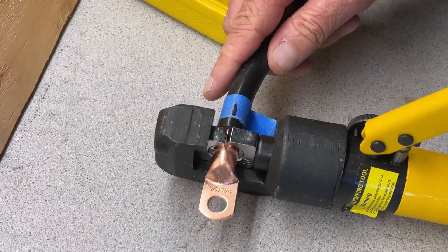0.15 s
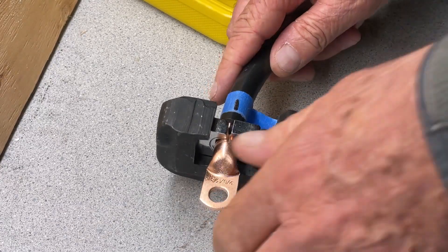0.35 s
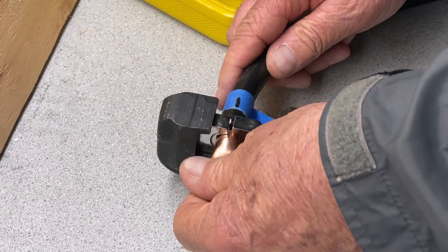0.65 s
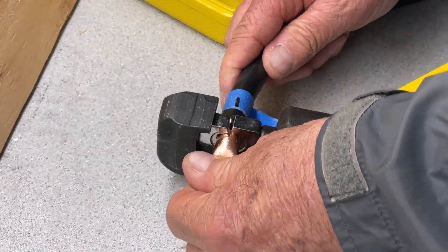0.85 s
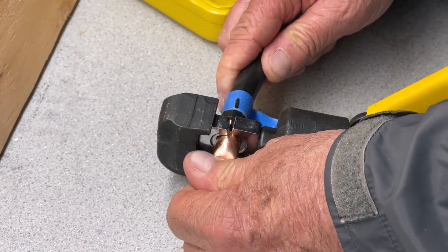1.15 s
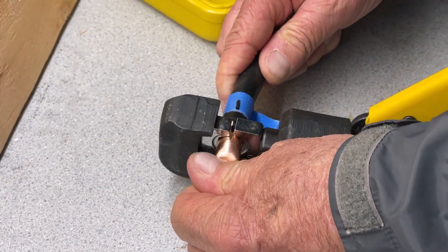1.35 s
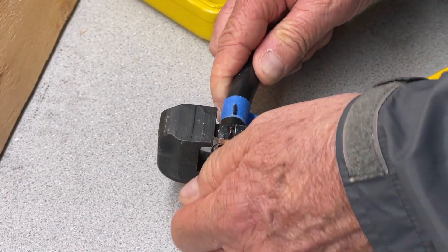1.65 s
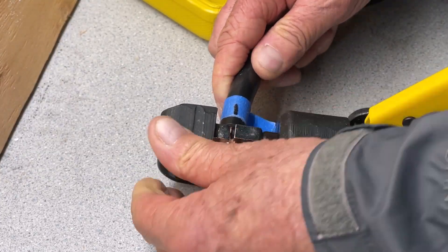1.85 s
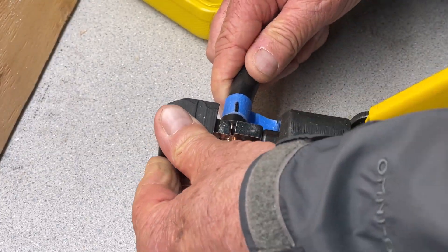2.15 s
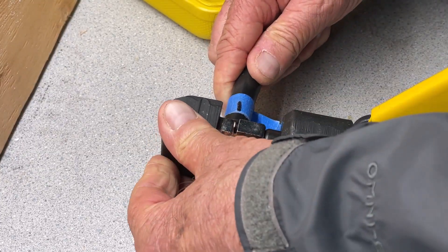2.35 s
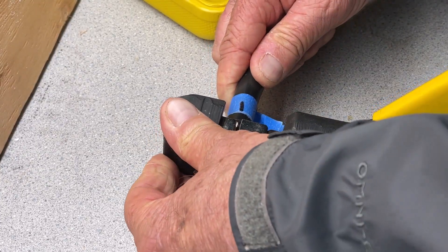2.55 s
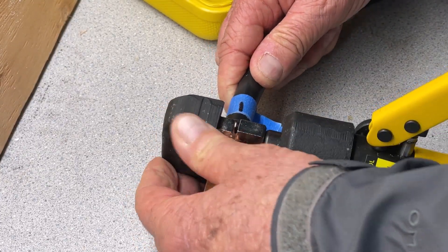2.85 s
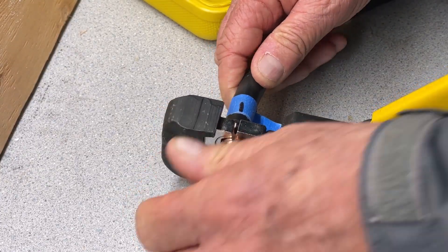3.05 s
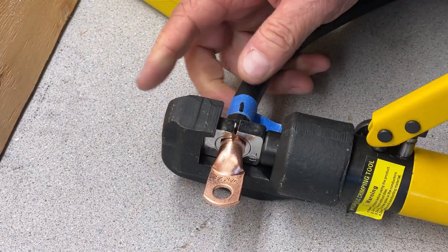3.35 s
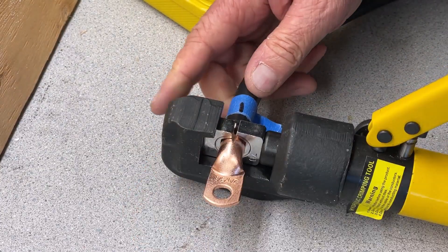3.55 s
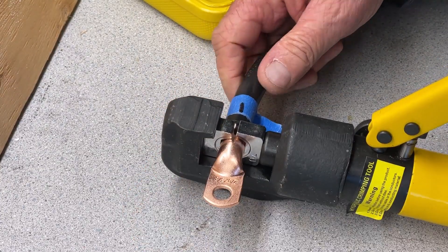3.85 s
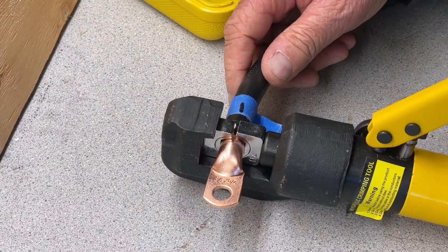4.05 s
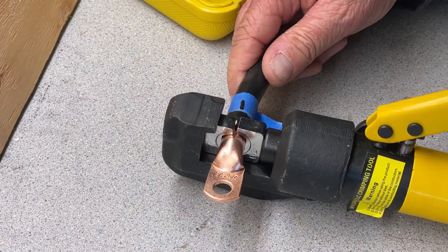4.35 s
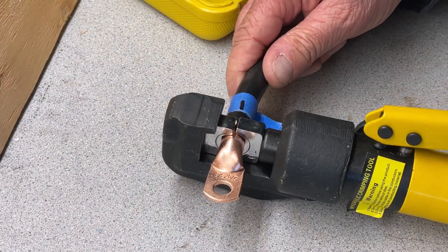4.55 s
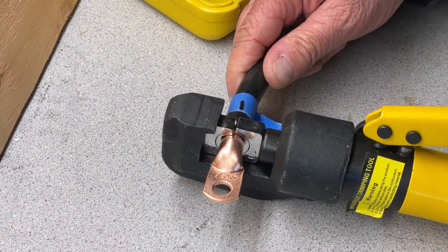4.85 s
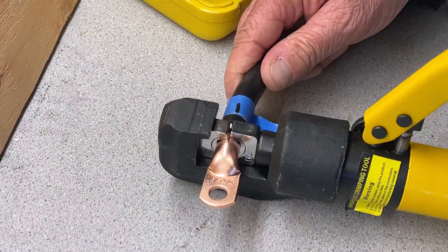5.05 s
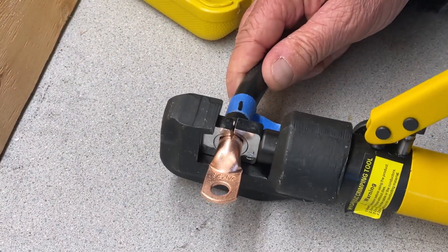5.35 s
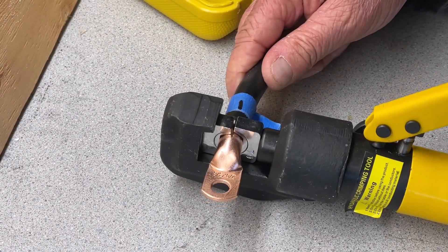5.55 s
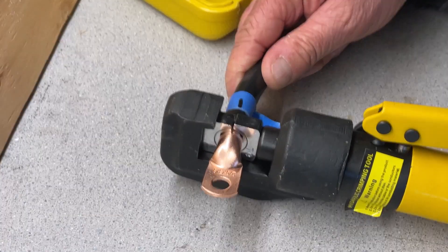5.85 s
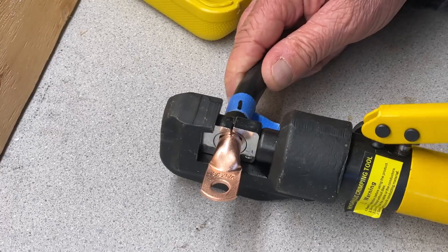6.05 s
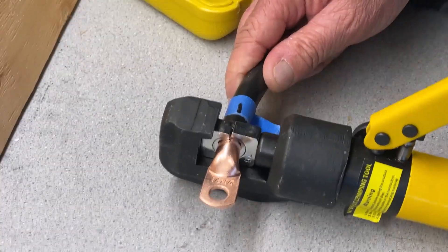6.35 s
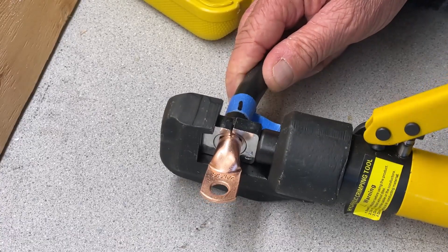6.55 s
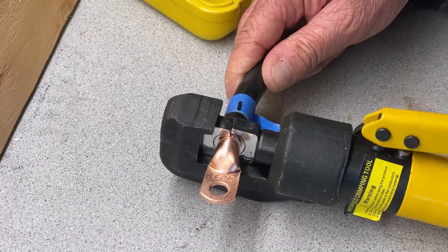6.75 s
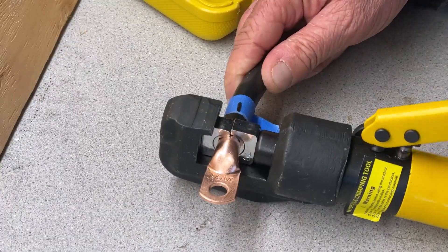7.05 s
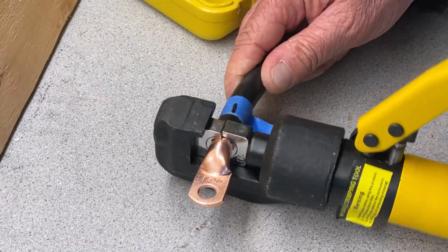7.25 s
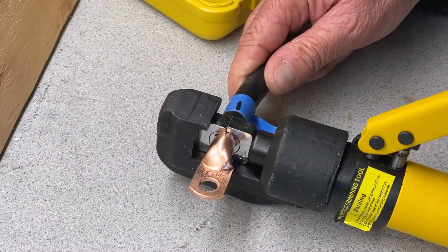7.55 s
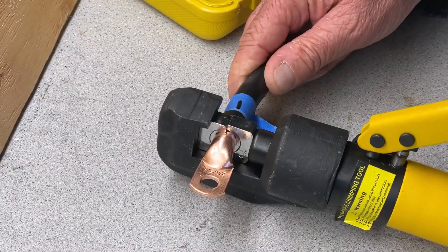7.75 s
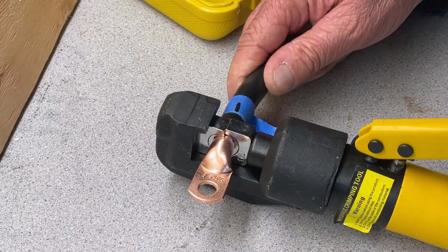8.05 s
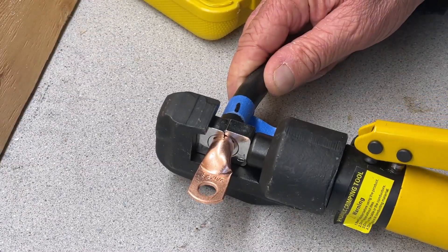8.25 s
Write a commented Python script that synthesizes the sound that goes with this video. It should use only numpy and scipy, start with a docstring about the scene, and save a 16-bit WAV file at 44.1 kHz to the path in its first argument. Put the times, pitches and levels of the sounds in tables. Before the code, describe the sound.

Hands shift a heavy hydraulic hand tool on a laminate bench, with a first firm knock, light taps, scraping jerks and brushing fabric. Then comes steady handle pumping, each stroke clicking and thudding into the hollow-sounding top over low rumble, growing to sharp steel clacks. A tiny buzz and faint whine trail off. Close microphone, dry small workshop.

```python
"""A thump through a laminate bench top is heard first, with the click of a hand-pumped hydraulic crimping tool.
Hands shift the tool and seat a lug, then pump the handle: pins click and each stroke ends in a thump.
Sleeves swish, skin rubs and the bench rumbles underneath; the microphone is close.
Blows and clicks excite decaying modes; friction is noise of a given colour under swelling envelopes.
Each source is computed as mid and side, and the pair is turned into left and right at the end."""
import sys
import numpy as np
from scipy import signal
from scipy.fft import rfft, irfft
from scipy.io import wavfile

SR = 44100
rng = np.random.default_rng(int(sys.argv[2]) if len(sys.argv) > 2 else 0)


def store_wav(level_fs):
    """Save 16-bit WAV to argv[1]."""
    pcm = np.round(np.clip(np.atleast_2d(level_fs), -1, 1) * 32767)
    wavfile.write(sys.argv[1], SR, pcm.T.astype(np.int16))


N = 370380
SPAN = 2 ** 15   # samples in one impulse response

# Blows into the bench: [t/s, mid peak level/dB, contact time constant/ms, weight behind the blow/dB,
# sway of the bench on its legs/dB, clank of steel on steel/dB, damping by the hands/(dB/s)]
THUMPS = [(.058, -11.5, 0.24, 4.5, -19, 5, 0), (.529, -18, 0.2, -18.5, 13, 0.5, 132),
          (.618, -43, 0.19, -25, 0, 3, 100), (1.576, -42, 0.43, -1, -11, 17, 24),
          (1.73, -34.5, 0.52, 21, 0, 0, 33), (1.924, -24, 0.26, -19, 14, 0, 139),
          (2.366, -51.5, 0.36, -19, -2, -8, 60), (2.754, -46, 0.68, -8, -4, -6, 30),
          (2.84, -49.5, 0.11, -40, 0, 12, 250), (2.878, -34, .64, -4, -16, 4, 95),
          (2.92, -15.5, 0.22, -22.5, 20, 3.5, 220), (4.638, -16.5, 1.3, -22, 2.5, 13, 11),
          (4.891, -30.5, 0.26, -2, 8.5, -3.5, 37), (5.071, -16, 0.77, 11.5, -3.5, -4, 198),
          (5.195, -1.5, 0.21, -2.8, -7, 6.5, 12), (5.392, -29.5, .92, 10, -8, 2.2, 24),
          (5.858, -12.5, 1.3, -18, -3.3, 16, 27), (6.081, -26.5, 0.46, -3.5, -14, -5, 24.5),
          (6.237, -12.5, 0.97, -1.8, -18, 0.5, 200), (6.351, -0.76, 0.25, -6, 9.5, 12.5, 17),
          (6.541, -31, 2.4, -7.5, -14, 15, 4), (6.819, -7, .67, -14, 16, -5, 40.5),
          (7.048, -28.5, 0.43, -7.5, 3, -5.5, 33), (7.207, -20.5, 1.3, 3.5, 2, -1.5, 195.5),
          (7.352, -0.9, 0.33, -11.5, -18, 23, 14.5), (7.543, -28.5, 1.2, 19, -29, 0, 24),
          (8.329, -33.5, 1.1, 28, 25, -5, 31)]
# Modes of the bench top, lowest first: [f/Hz, level/dB, t60/s]
BENCH_MODES = [(51, -9, 0.21), (82.6, -5, 0.26), (112, 1, 0.24), (143.4, -0.5, 0.18), (184.4, -8.5, 0.18),
               (240.5, 1.5, 0.12), (308, -9, 0.19), (347, -5, 0.033), (393, -7, 0.14), (466, 1, 0.051),
               (548, -6.5, 0.068), (662.4, -13, 0.062), (746.5, -11.5, 0.092), (962, -12.5, 0.084),
               (1059, -9.5, 0.055), (1123, -16, 0.03), (1232, -31, 0.43), (1256, -16.5, 0.066),
               (1440, -20.5, 0.068), (1750, -19.5, 0.11), (2160, -22.5, .03), (2700, -13.5, .02)]
# Modes of the steel tube of the handle: [f/Hz, level/dB, t60/s]
HANDLE_MODES = [(1200, 0, .75), (1556, 0, .45)]
# The handle meets its stop and rings: [t/s, level/dB]
HANDLE_RINGS = [(5.195, -48), (6.351, -52)]
CLANK_HZ, CLANK_OCTAVES = 1420, 0.87
PUSH_MS, PUSH_PER_CONTACT = 2.66, 2.7   # the slow push lasts longer under a softer contact
MODE_SPREAD_DB = 1.9   # each blow finds the modes a little differently
TRAVEL_MS = 12.19   # bending waves at 100 Hz, blow to microphone

# Pins, dies and valve balls clicking: [t/s, mid peak level/dB, pitch f/Hz, rattle t60/s, relative treble level/dB]
CLICKS = [(.0583, -34.5, 2390, .02, 7), (.1212, -39.5, 1910, 0.024, -6), (0.5316, -34, 1630, 0.021, -12.5),
          (1.927, -36.5, 1780, 0.023, -4), (2.8636, -46, 2380, 0.051, 1), (2.8977, -43.5, 2240, 0.059, -4),
          (2.9188, -36, 1410, 0.033, -7), (4.6394, -33, 1910, 0.03, 1), (4.859, -26, 4840, 0.049, -18.5),
          (4.873, -25, 4800, 0.018, -5.5), (4.884, -29, 1580, 0.022, -6), (4.893, -13.5, 3640, 0.024, 5),
          (5.0617, -38, 2510, .025, -3), (5.0835, -34, 3640, 0.022, -3), (5.1955, -12.5, 2025, 0.06, 5),
          (5.2177, -25.5, 1915, 0.036, -9), (5.232, -28, 2510, 0.044, -9), (5.86, -30.5, 1850, 0.01, -5),
          (6.0326, -36, 1500, 0.033, -9.5), (6.049, -33, 4100, 0.055, -8.5), (6.073, -23, 1490, 0.018, -6),
          (6.08, -12.5, 1820, 0.029, 13), (6.2036, -26, 4170, 0.025, -24), (6.2326, -23.5, 2470, 0.038, 7),
          (6.3516, -11, 1936, 0.063, 1.5), (6.8022, -37.5, 1500, 0.0077, -13),
          (6.8199, -28, 1850, 0.082, -19.5), (7.0026, -38, 1730, 0.017, -5), (7.0135, -28.5, 3970, .044, 6),
          (7.0406, -23.5, 1547, 0.023, 10.5), (7.0468, -15.5, 1515, 0.025, 5),
          (7.201, -38.5, 2236, 0.025, -3), (7.352, -2, 1510, 0.048, -3.5), (7.374, -18.5, 1448, 0.05, -3)]
# Modes of the steel head and linkage: [f/Hz, level/dB, t60/s]
STEEL_MODES = [(1480, 3, .009), (1970, 4, .007), (2430, 4.5, .007), (2930, 6, .006), (3610, 7, .008),
               (4100, 1, .008), (4600, 3, .01), (5030, 5, .008), (5750, -5, .007), (6120, -12, .007),
               (7250, -22, .03)]
CRACK_DB = 9   # broad crack beside the ringing steel

# Jerks of the tool slipping on the laminate: [t/s, relative level/dB, t60/s, relative treble level/dB]
SLIPS = [(1.016, -43.5, 0.2, 4), (1.039, -32, 0.069, 7.5), (1.081, -39, 0.11, -11), (1.095, -34, 0.14, -2),
         (1.109, -25, 0.047, 5), (1.133, -30.5, 0.25, 1), (1.144, -24, 0.089, 2), (1.16, -23.5, 0.046, 0),
         (1.166, -19, 0.018, 3), (1.191, -35, 0.073, 7.5), (1.224, -33, 0.065, 2.5),
         (1.318, -50, 0.029, 16.5), (2.017, -43, 0.073, 2.5), (2.151, -33, 0.054, 8),
         (2.172, -47.5, 0.37, 4), (2.256, -47, 0.032, 14), (2.536, -37, 0.049, 6),
         (2.67, -45.5, 0.039, 4.5), (8.237, -48, 0.048, -8), (8.325, -51, 0.069, -1)]
# Power density of grit on laminate: [f/Hz, level/dB]
LAMINATE_SPECTRUM = [(100, -16), (250, -1), (500, 6.5), (1200, -4), (2800, 3.5), (4500, -5), (8000, -5),
                     (13000, -13), (16000, -14)]

# The linkage buzzes on after the last stroke: [start t/s, rise/s, hold/s, level/dB]
BUZZ = [(7.355, .008, .07, -45.5)]
BUZZ_LOW_HZ, BUZZ_HIGH_HZ, BUZZ_FADE_DB_PER_S = 950, 1650, 65

# Two narrow resonances of the valve: [f/Hz, width of one filter pass/Hz, level/dB]
VALVE_RESONANCES = [(1250, 120, 0), (2000, 140, -5)]
WHINE_START_S, WHINE_DB, WHINE_FADE_DB_PER_S, WHINE_END_S = 7.4, -65, 8.5, 8.03
WHINE_WAVER_DB, WHINE_WAVER_HZ = 1.5, 12

# A nylon sleeve swishes: [start t/s, rise/s, hold/s, level/dB, extra sheen in the treble/dB]
SWISHES = [(.29, 0.049, .17, -52, 1.5), (.6, 0.093, .04, -61.5, 0), (1.05, 0.22, .1, -70, -12.5),
           (1.5, 0.23, .02, -60.5, -2), (1.73, 0.0072, .06, -73.5, 23), (1.8, 0.14, .03, -53, 2.5),
           (2.93, 0.19, .22, -48.5, 5.5), (3.49, 0.06, .26, -51, 2.5), (3.85, 0.018, .12, -60.5, 6.5),
           (4.095, 0.15, 0.082, -56, 4.5), (4.307, 0.11, .2, -46.5, 4.5), (4.78, 0.044, .06, -53.5, 7),
           (4.95, 0.045, .1, -56, 0), (5.2, 0.037, .08, -62, -11), (5.7, 0.15, .03, -58, -2),
           (6.1, 0.1, 0.051, -52, -0.5), (6.72, 0.092, .04, -55.5, -4), (6.97, 0.057, .03, -57, -9),
           (7.1, 0.066, .06, -55, 0), (7.3, 0.03, .2, -70, -3), (7.68, 0.074, .05, -63.5, -1),
           (8.15, 0.079, .09, -56.5, 2)]
# Faint hiss between swishes: [t/s, level/dB]
HISS = [(0, -65), (1.3, -64), (1.42, -78), (1.52, -64.5), (2.9, -68), (3.4, -56.5), (4.1, -60), (5.4, -62),
        (6.0, -70.5), (6.5, -68.5), (7.4, -59), (7.65, -68), (8.4, -66.5)]
# Power density of the nylon: [f/Hz, level/dB]
SWISH_SPECTRUM = [(700, -7), (1500, 0.5), (2500, 4.5), (4000, 2), (6000, 0), (8500, 1), (11000, -4),
                  (13500, -5.5), (15000, -4), (15700, -13.5), (16100, -4.5)]
SWISH_FADE_DB_PER_S, HISS_SHEEN_DB = 229, 1.5

# Hands grip, shift and lean: [start t/s, rise/s, hold/s, skin and cable rub level/dB, bench rumble level/dB]
MOVES = [(0, 0.0035, 0.14, -63.5, -55), (0.406, 0.16, 0.074, -59, -54.5), (1.021, 0.075, 0.1, -46, -38.5),
         (1.61, 0.11, .02, -84, -56), (1.89, 0.084, .02, -58, -53), (2.124, 0.041, 0.04, -54, -50.5),
         (2.36, 0.065, .04, -83, -65), (2.502, 0.038, 0.036, -59.5, -58), (2.71, 0.21, .02, -77, -47.5),
         (2.923, 0.071, 0.024, -52.5, -54), (3.132, 0.061, 0.18, -63, -58.5),
         (3.625, 0.18, .03, -67.5, -62), (4.095, 0.064, 0.5, -91, -68), (4.46, 0.027, 0.14, -85, -50.5),
         (4.705, 0.043, 0.63, -60.5, -49), (5.195, 0.08, 0.024, -56.5, -54),
         (5.617, 0.13, 0.89, -69.5, -49.5), (6.337, 0.017, 0.023, -51, -32.5),
         (6.66, 0.15, .02, -65, -43.5), (6.91, 0.045, 0.54, -63, -49.5), (7.32, 0.027, 0.11, -45.5, -44.5),
         (7.597, 0.13, .03, -65, -55), (7.984, 0.14, 0.018, -72, -52), (8.172, .09, 0.039, -63, -78)]
# Power density of the rub: [f/Hz, level/dB]
RUB_SPECTRUM = [(150, -50.5), (300, -1), (500, -2.5), (900, -8), (1500, -14), (2200, -27.5), (3000, -48)]
# Power density of the bench rumble: [f/Hz, level/dB]
RUMBLE_SPECTRUM = [(25, -30.5), (50, 8.5), (75, 0.5), (108, 5.5), (150, -1.5), (240, -7.5), (400, -33.5)]
MOVE_FADE_DB_PER_S, REST_RUB_DB, REST_RUMBLE_DB = 125.5, -71, -59.5
RISE_DB = 17.5   # every gesture starts this far below its full level

# The shop and the dense upper modes of the bench answering a blow: [f/Hz, level/dB, t60/s]
TAIL = [(50.6, -33.5, 1), (125, -11.5, 0.36), (290, -20.5, 0.54), (690, -25.5, 0.38), (1270, -32, 0.39),
        (2500, -13, 0.095), (6000, -34, 0.76), (14000, -46, .2)]
# Gain of the side signal, the width of the stage: [f/Hz, level/dB]
WIDTH = [(60, -26), (120, -17), (250, -6.5), (500, -4.5), (900, -2.5), (1300, -5), (1800, -20.5),
         (2500, -18.5), (6000, -6.5), (8000, -46.5), (9500, -10.5), (11000, -17), (13500, -31)]
# Phase between the microphone channels: [f/Hz, lead of the left/rad]
PHASE_TURN = [(1800, 0), (2700, .4), (4200, .6), (5080, .7), (5770, -1.7), (6720, -.5), (7580, -2.2),
              (8100, -2.4), (8750, -3.14), (9400, -3.6), (10200, -4.0), (11900, -5.6), (13200, -6.2),
              (16400, -6.3)]
MIC_LOW_HZ, STOPBAND_HZ = 49.6, 16800


def amp(db):
    """The definition of level: 20 dB to a factor of ten in amplitude."""
    return 10 ** (np.asarray(db) / 20)


def rms_one(x):
    """Normalisation by mean power, taken over all channels together."""
    return x / np.sqrt(np.mean(x ** 2) + 1e-20)


def at_hz(points, hz, axis=1):
    """Interpolation of a table column on a logarithmic frequency axis."""
    points = np.array(points)
    return np.interp(np.log(np.maximum(hz, 1)), np.log(points[:, 0]), points[:, axis])


def coloured(x, spectrum):
    """Linear filtering: each frequency of x is weighted by a spectrum in dB."""
    size = x.shape[-1]
    return irfft(rfft(x) * amp(at_hz(spectrum, np.fft.rfftfreq(size, 1 / SR))), size)


def filtered(x, order, hz, kind):
    """Butterworth filtering: a maximally flat passband."""
    return signal.sosfilt(signal.butter(order, hz, kind, fs=SR, output="sos"), x)


def wide_noise(spectrum):
    """Incoherence: independent mid and side noise of one colour, rms 1."""
    return rms_one(coloured(rng.standard_normal((2, N)), spectrum))


def drift(corner_hz):
    """Random modulation: noise through two equal low-pass poles, rms 1."""
    step = 40   # samples between computed values
    r = np.exp(-2 * np.pi * corner_hz * step / SR)
    noise = rng.standard_normal(N // step + 2002)
    slow = signal.lfilter([1], [1, -2 * r, r * r], noise)[2000:]
    return np.interp(np.arange(N) / step, np.arange(len(slow)), rms_one(slow))


def ringing(modes):
    """Modal decay: one exponentially decaying sine a mode, as rows."""
    hz, db, t60 = np.transpose(modes)[:, :, None]
    t = np.arange(SPAN) / SR
    return amp(db - 60 * t / t60) * np.sin(2 * np.pi * hz * t)


def gestures(rows, rest_db, fade_db_per_s):
    """Addition of powers: gestures swell, hold and fade in dB above a resting level."""
    t = np.arange(N // 64 + 2) * 64 / SR
    start, rise, hold, db = np.transpose(rows)[:, :, None]
    rising = RISE_DB * np.minimum((t - start) / np.maximum(rise, .004) - 1, 0)
    fading = fade_db_per_s * np.maximum(t - start - rise - hold, 0)
    power = np.sum(amp(db + rising - fading) ** 2 * (t >= start), axis=0)
    return np.sqrt(np.interp(np.arange(N) / SR, t, power) + amp(rest_db) ** 2)


def add(out, s, x):
    """Superposition: mix x in from time s."""
    i = round(s * SR)
    out[..., i:i + x.shape[-1]] += x[..., :N - i]


def thumps(answer):
    """Dispersion: a soft contact drives the modes and bending waves bring the treble first, a downward swoop."""
    out = np.zeros((2, N))
    hz = np.fft.rfftfreq(2 * SPAN, 1 / SR)
    bench, room = rfft(ringing(BENCH_MODES), 2 * SPAN), rfft(answer, 2 * SPAN)
    count = len(BENCH_MODES)
    chance = rng.normal(0, 1, (len(THUMPS), 2, count))
    # the delay falls as 1 / sqrt(f)
    swoop = np.exp(-4j * np.pi * TRAVEL_MS / 1000 * np.sqrt(100 * hz))
    # the time given is the arrival of the treble
    lead = np.exp(2j * np.pi * hz * TRAVEL_MS / 6000)
    clank_shape = np.exp(-(np.log2((hz + 1) / CLANK_HZ) / CLANK_OCTAVES) ** 2)
    for row, (strength, lean) in zip(THUMPS, chance):
        s, db, contact_ms, weight_db, sway_db, clank_db, damping_db = row
        # each mode reaches the sides out of step
        side_phase = np.exp(1j * (np.pi / 2 + .5 * lean))
        weights = amp(MODE_SPREAD_DB * strength) * np.array([np.ones(count), side_phase])
        weights[:, 0] *= amp(sway_db)   # the lowest mode is the whole bench on its legs
        contact = 1 / (1 + 2j * np.pi * hz * contact_ms / 1000) ** 3
        contact *= amp(clank_db * clank_shape)
        # the slow part of the blow feeds the lows
        push_ms = PUSH_MS + PUSH_PER_CONTACT * contact_ms
        push = amp(weight_db / (1 + (hz * push_ms / 1000) ** 4))
        blow = irfft((weights @ bench + room) * contact * push * swoop * lead)[:, :SPAN]
        blow *= amp(-damping_db * np.arange(SPAN) / SR)
        add(out, s, amp(db) * blow / np.abs(blow[0]).max())
    return out


def handle_rings():
    """Free vibration: the steel tube rings on after meeting its stop, the side at half the mid."""
    out = np.zeros((2, N))
    tube = ringing(HANDLE_MODES).sum(axis=0)
    for s, db in HANDLE_RINGS:
        add(out, s, amp(db) * tube * [[1], [.5]])
    return out


def clicks():
    """Impulse excitation: rattling contacts crack and strike the steel modes, most of all near the pitch."""
    out = np.zeros((2, N))
    steel, modes_hz = ringing(STEEL_MODES)[:, :4096], np.array(STEEL_MODES)[:, 0]
    t = np.arange(2048) / SR
    crack = filtered(signal.unit_impulse(4096), 2, 900, "high")
    soft = filtered(crack, 2, 5500, "low")
    for s, db, hz, t60, treble_db in CLICKS:
        # sparse random contacts that die away after the first
        contacts = rng.random(2048) < .15
        rattle = rng.standard_normal((2, 2048)) * contacts * amp(-60 * t / t60)
        rattle[0, 0] = 0.88
        near_db = np.where(modes_hz > 6000, treble_db, -11 * np.abs(np.log2(modes_hz / hz)))
        body = amp(2 * rng.standard_normal(len(STEEL_MODES)) + near_db) @ steel
        body += amp(CRACK_DB) * soft + amp(15.0 + treble_db) * (crack - soft)
        tick = signal.fftconvolve(rattle, body[None])
        add(out, s, amp(db) * tick / np.abs(tick[0]).max())
    return out


def slips():
    """Stick-slip friction: each jerk is a quick, dying burst of grit that sets the steel head singing."""
    dull, bright = np.zeros(N), np.zeros(N)
    t = np.arange(8192) / SR
    for s, db, t60, treble_db in SLIPS:
        burst = amp(db - 2.5 - 60 * t / t60) * (1 - np.exp(-t / 0.0035))
        add(dull, s, burst)
        add(bright, s, burst * amp(treble_db))
    grit = wide_noise(LAMINATE_SPECTRUM) * amp(4.5 * drift(250))
    top = filtered(grit, 2, 5000, "high")
    head = ringing(STEEL_MODES)[:, :4096].sum(axis=0)
    singing = rms_one(signal.fftconvolve(grit, head[None], axes=1)[:, :N])
    return dull * (grit - top + amp(-16.5) * singing) + bright * top


def buzz():
    """Band-limited noise: the linkage buzzes as a grainy band in the low steel modes."""
    band = filtered(rng.standard_normal((2, N)), 4, [BUZZ_LOW_HZ, BUZZ_HIGH_HZ], "band")
    grain = rms_one(band) * amp(1.2 * drift(60))
    return grain * gestures(BUZZ, -150, BUZZ_FADE_DB_PER_S)


def whine():
    """Resonance: noise passes each resonance twice, a faint wavering two-note whine, perhaps oil past the valve."""
    tones = 0
    for hz, width, db in VALVE_RESONANCES:
        r = np.exp(-np.pi * width / SR)
        pole = [1, -2 * r * np.cos(2 * np.pi * hz / SR), r * r]
        once = signal.lfilter([1, 0, -1], pole, rng.standard_normal(N))
        tones = tones + amp(db) * rms_one(signal.lfilter([1], pole, once))
    t = np.arange(N) / SR
    level_db = WHINE_DB - WHINE_FADE_DB_PER_S * (t - WHINE_START_S)
    level_db -= 140 * np.maximum(t - WHINE_END_S, 0)   # faster fade at the end
    level_db += WHINE_WAVER_DB * drift(WHINE_WAVER_HZ)
    return tones * amp(level_db) * (t > WHINE_START_S)


def sleeves():
    """Friction noise: nylon swishes smoothly, its treble sheen following a level of its own."""
    swishes = np.array(SWISHES)
    hiss_db = np.interp(np.arange(N) / SR, *np.transpose(HISS))
    sheen_rows = np.c_[swishes[:, :3], swishes[:, 3] + swishes[:, 4]]
    body_level = gestures(swishes[:, :4], hiss_db, SWISH_FADE_DB_PER_S)
    sheen_level = gestures(sheen_rows, hiss_db + HISS_SHEEN_DB, SWISH_FADE_DB_PER_S)
    nylon = wide_noise(SWISH_SPECTRUM)
    sheen = coloured(nylon, [(5000, -40), (9000, 0)])
    flutter = amp(1.0 * drift(5.3) + 1.1 * drift(200))
    return (body_level * (nylon - sheen) + sheen_level * sheen) * flutter


def skin_rub():
    """Modulated friction noise: skin and cable rub in patches as the hands move."""
    rub = wide_noise(RUB_SPECTRUM) * amp(0.78 * drift(8.9) + 0.6 * drift(74))
    return rub * gestures(np.array(MOVES)[:, :4], REST_RUB_DB, MOVE_FADE_DB_PER_S)


def bench_rumble():
    """Low-frequency noise: the bench rumbles in lumps under the moving hands."""
    rumble = wide_noise(RUMBLE_SPECTRUM) * amp(2.2 * drift(18))
    return rumble * gestures(np.delete(np.array(MOVES), 3, axis=1), REST_RUMBLE_DB, MOVE_FADE_DB_PER_S)


def tail():
    """Reverberation: half-octave bands of noise swell briefly and die at their own rates, in mid and side."""
    t = np.arange(SPAN) / SR
    edges = 35 * 2 ** np.arange(0, 9.1, .5)
    out = 0
    for low, high in zip(edges, edges[1:]):
        band = filtered(rng.standard_normal((2, SPAN)), 2, [low, high], "band")
        hz = np.sqrt(low * high)
        decay_db = at_hz(TAIL, hz) - 60 * t / at_hz(TAIL, hz, axis=2)
        out = out + rms_one(band) * amp(decay_db)
    return out * (1 - np.exp(-t / 0.0013))


def scene():
    """Superposition: all sources add as mid and side, which give left and right by sum and difference."""
    answer = tail()
    ticks = clicks()
    echoes = amp(-38) * signal.fftconvolve(ticks[:1], answer, axes=1)[:, :N]
    tool = thumps(answer) + handle_rings() + ticks + echoes + slips() + buzz() + whine()
    mid, side = tool + sleeves() + skin_rub() + bench_rumble()
    side = coloured(side, WIDTH)
    return np.array([mid + side, mid - side])


def record(dry):
    """Transduction: channels are phase-turned, deepest bass dropped, loud peaks rounded and the top cut."""
    hz = np.fft.rfftfreq(N, 1 / SR)
    lead = np.interp(hz, *np.transpose(PHASE_TURN))
    turn = np.exp(.5j * lead * np.array([[1], [-1]]))   # half the lead to each channel
    turned = irfft(rfft(dry) * turn, N)
    thinned = filtered(turned, 4, MIC_LOW_HZ, "high")
    rounded = 1.2 * np.tanh(thinned / 1.2)
    return signal.sosfilt(signal.cheby2(12, 70, STOPBAND_HZ, fs=SR, output="sos"), rounded)


dry = scene()
out = record(dry)
store_wav(out)
```